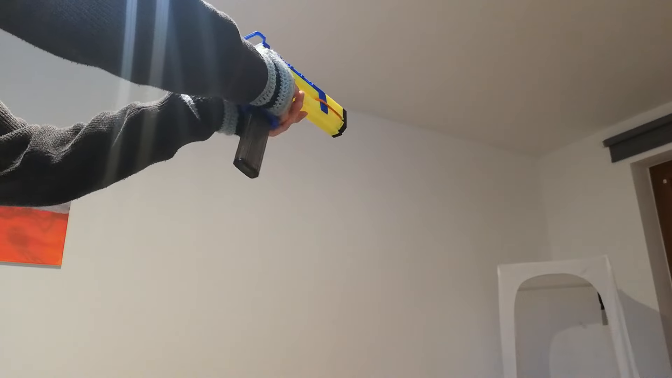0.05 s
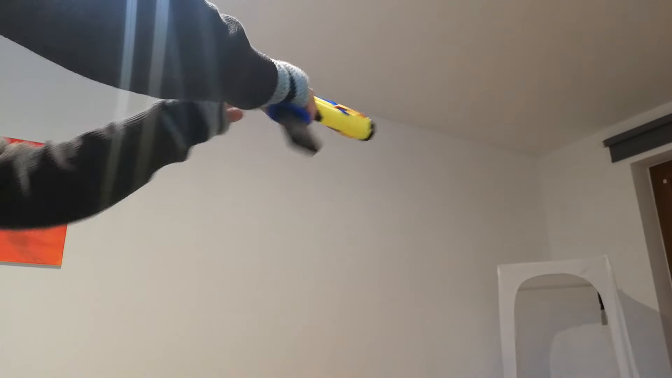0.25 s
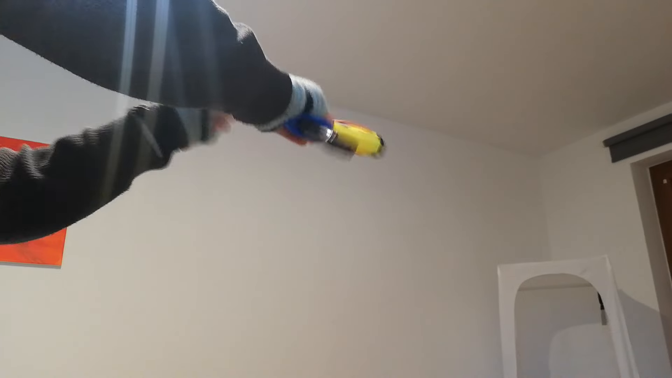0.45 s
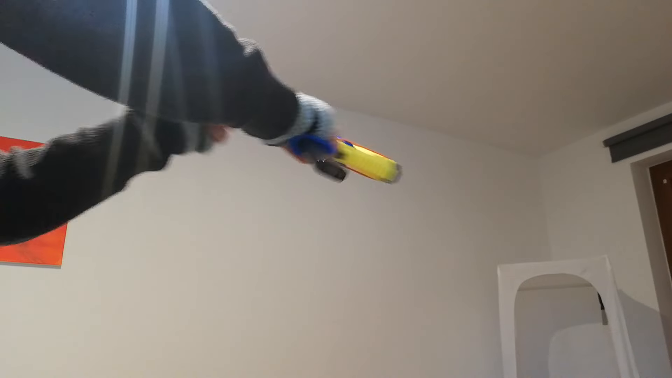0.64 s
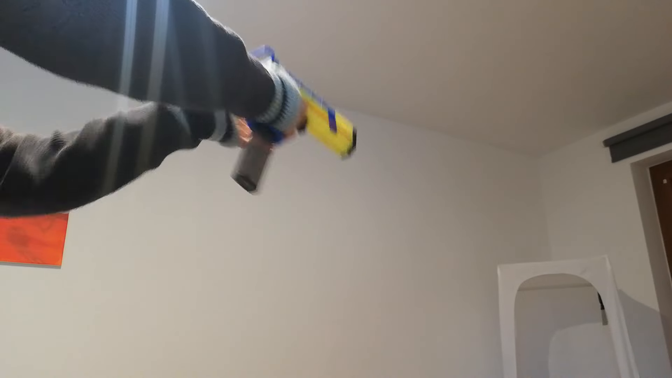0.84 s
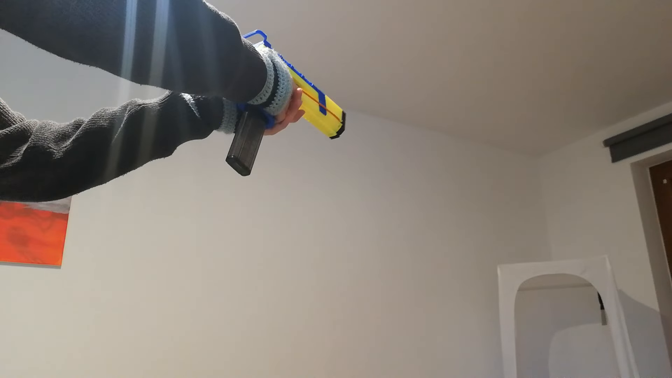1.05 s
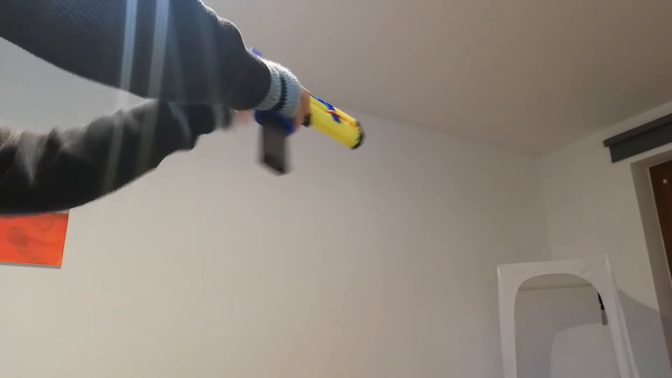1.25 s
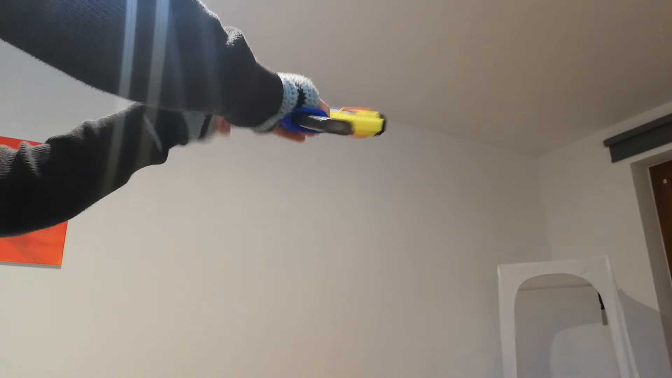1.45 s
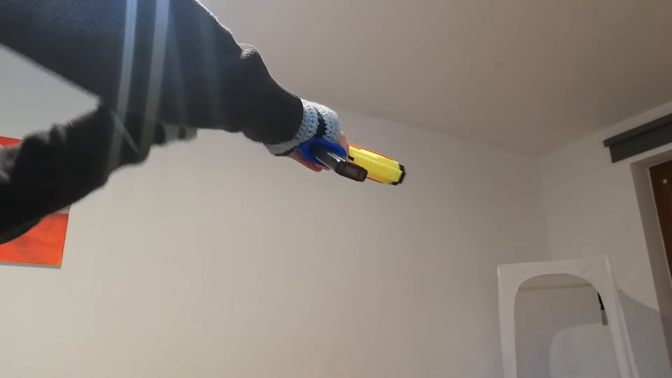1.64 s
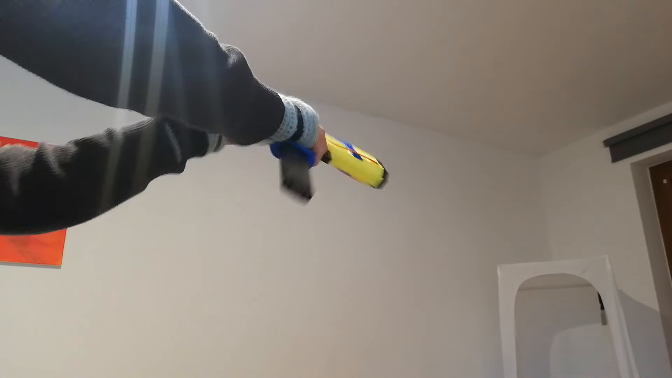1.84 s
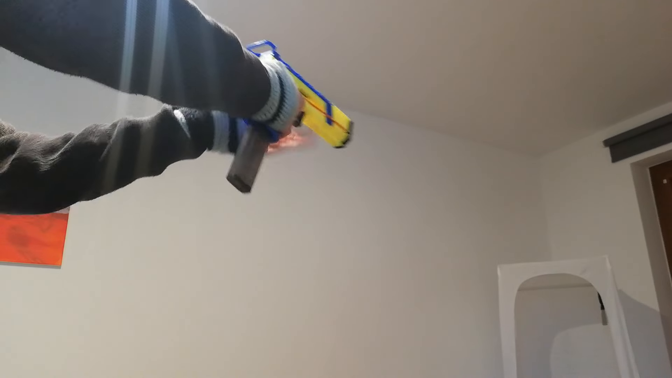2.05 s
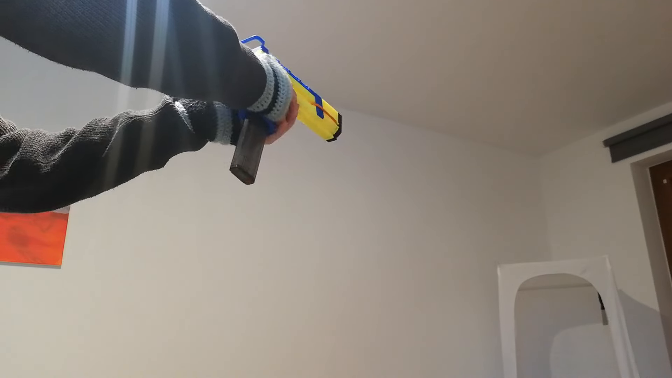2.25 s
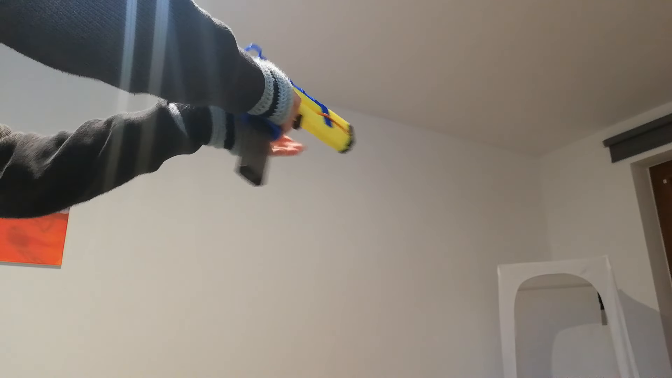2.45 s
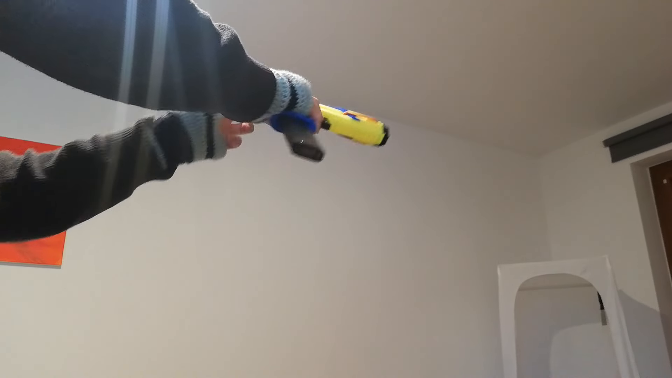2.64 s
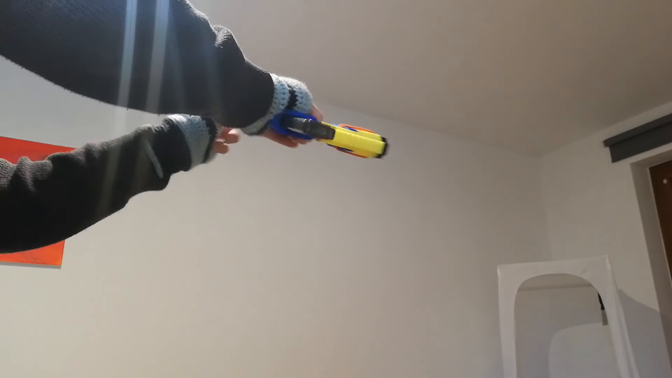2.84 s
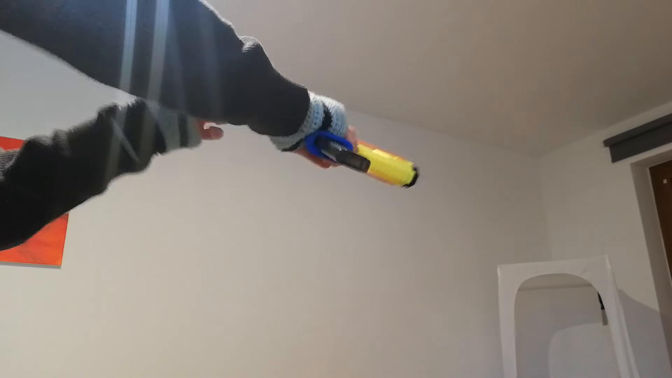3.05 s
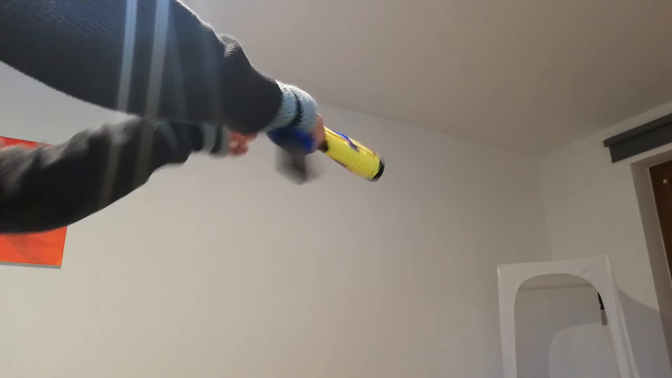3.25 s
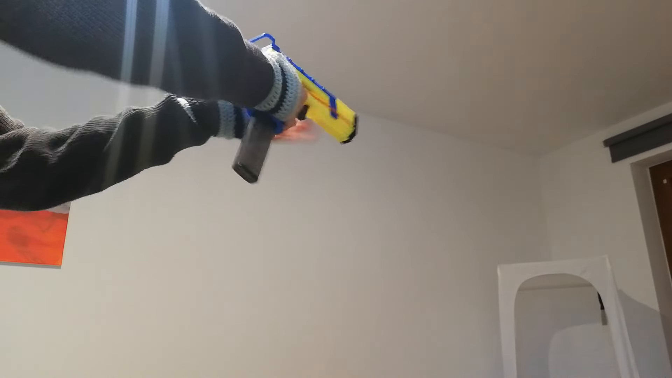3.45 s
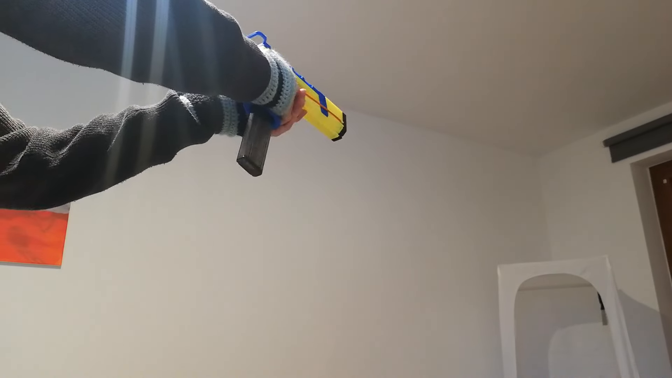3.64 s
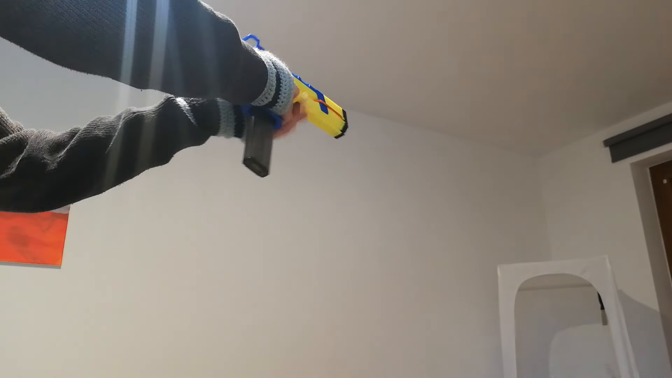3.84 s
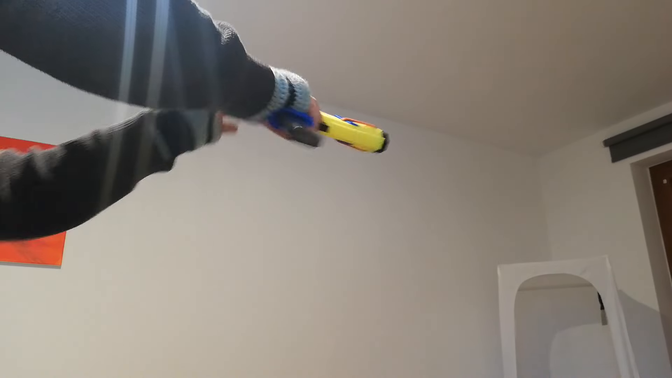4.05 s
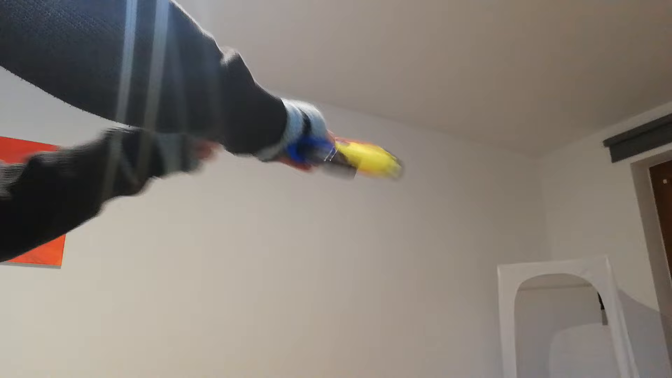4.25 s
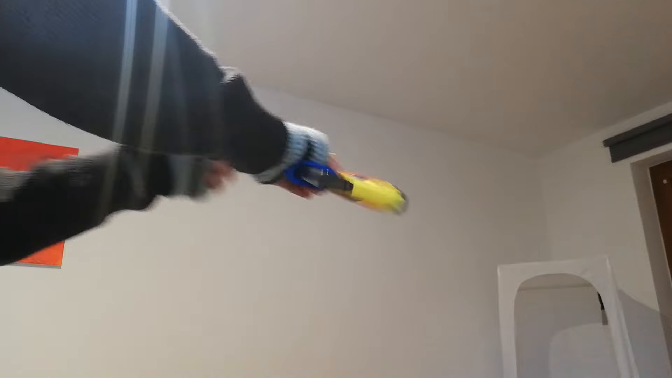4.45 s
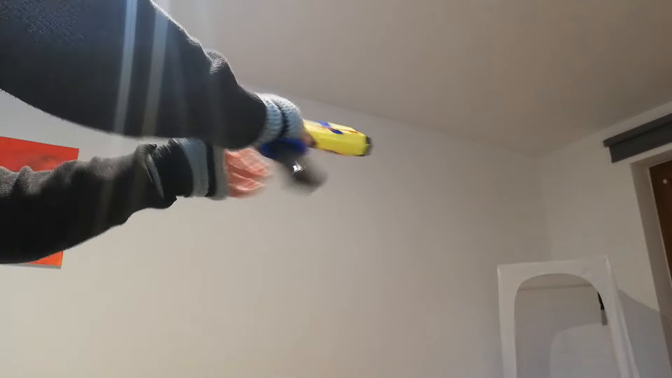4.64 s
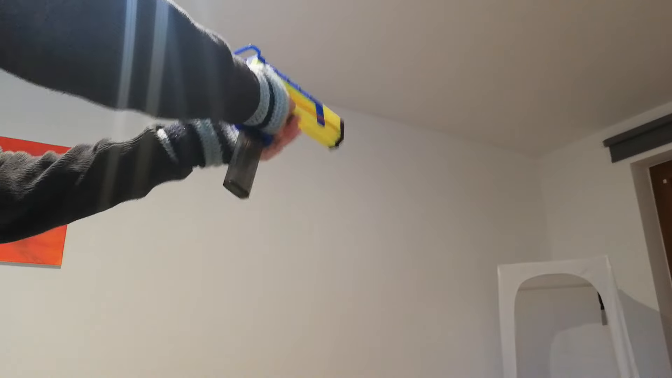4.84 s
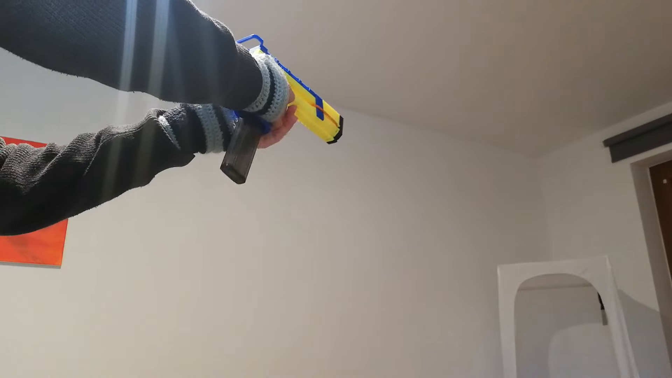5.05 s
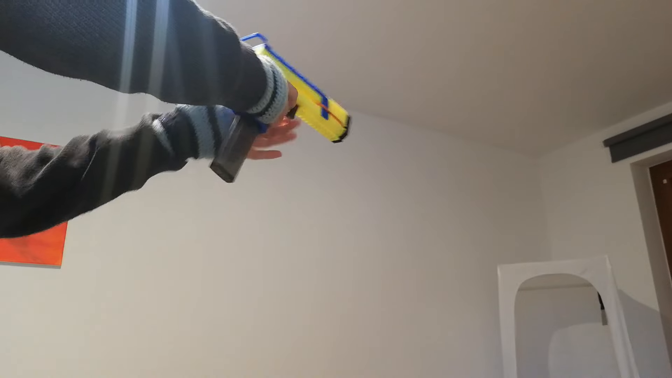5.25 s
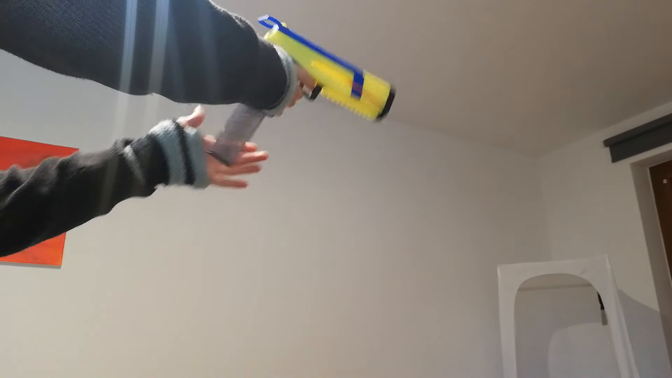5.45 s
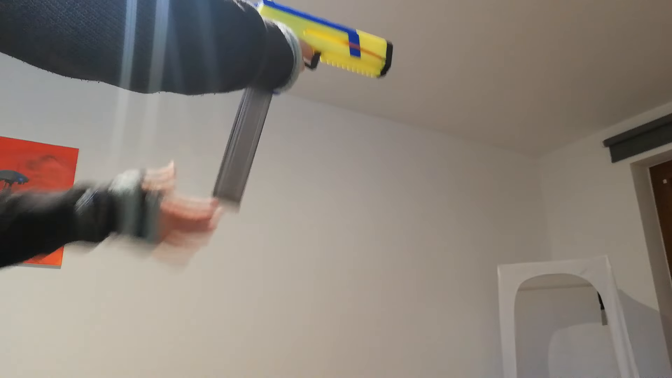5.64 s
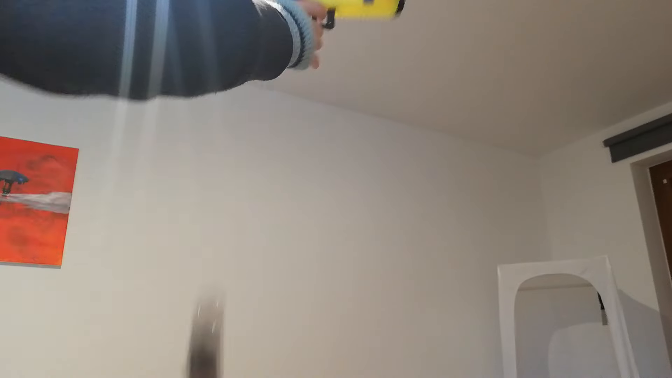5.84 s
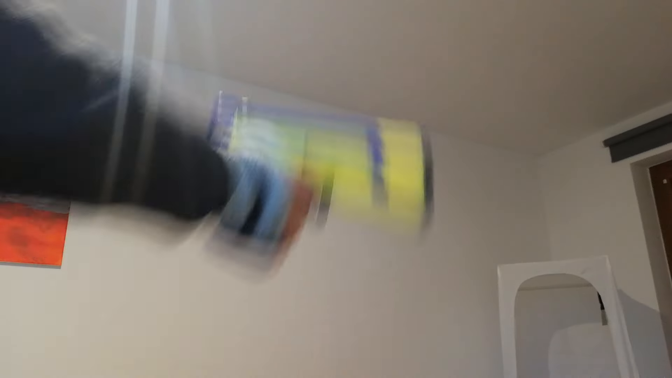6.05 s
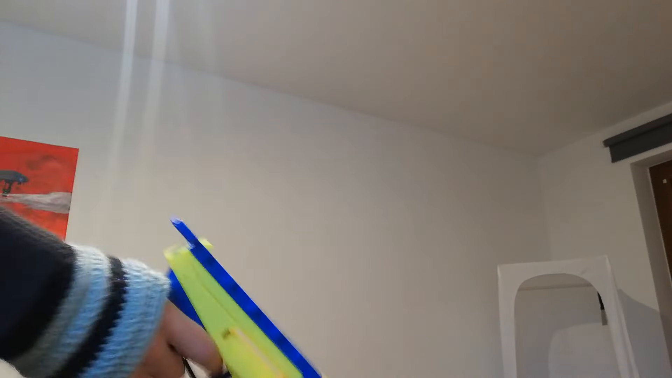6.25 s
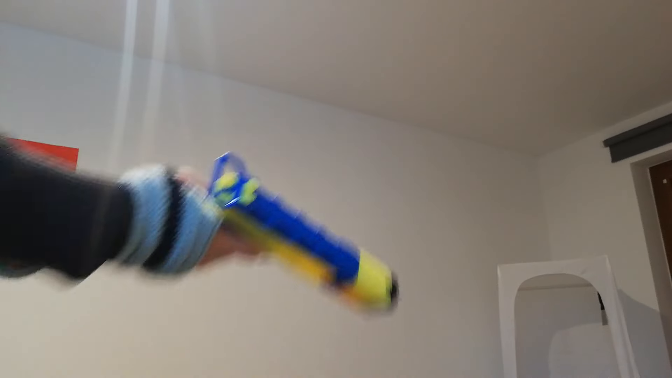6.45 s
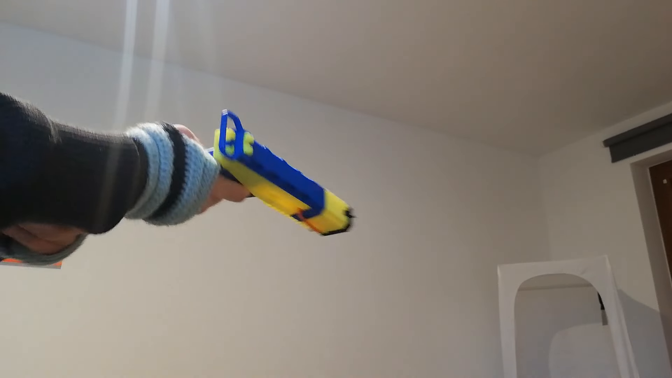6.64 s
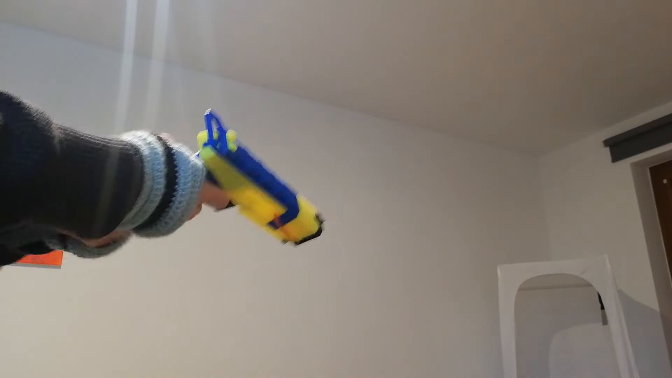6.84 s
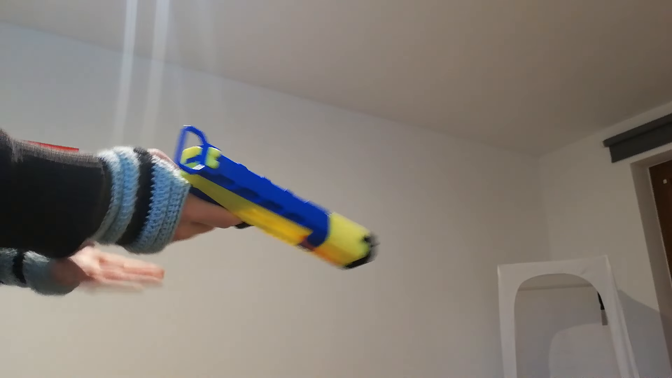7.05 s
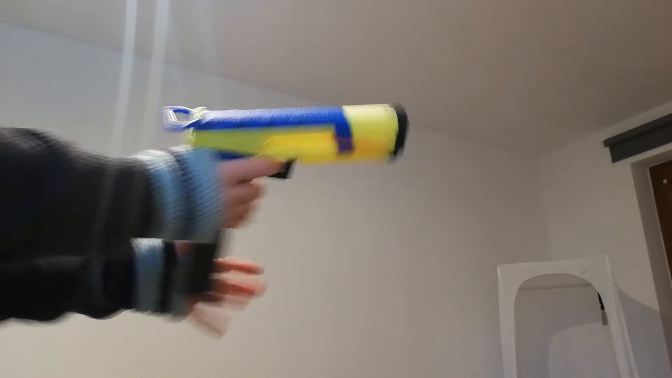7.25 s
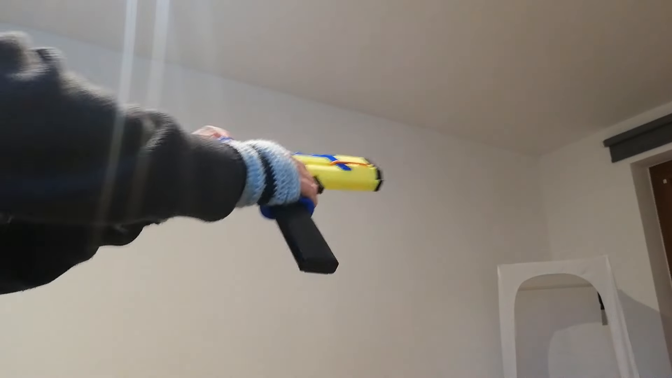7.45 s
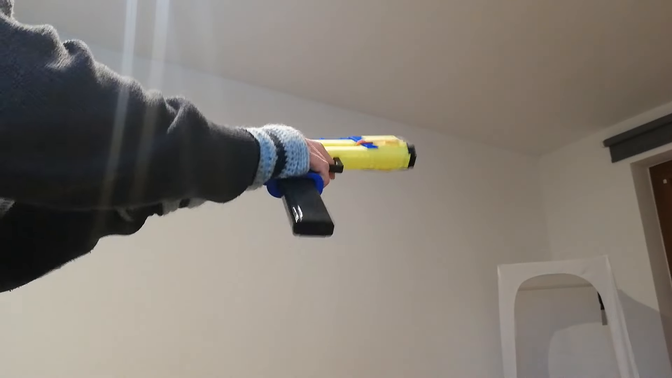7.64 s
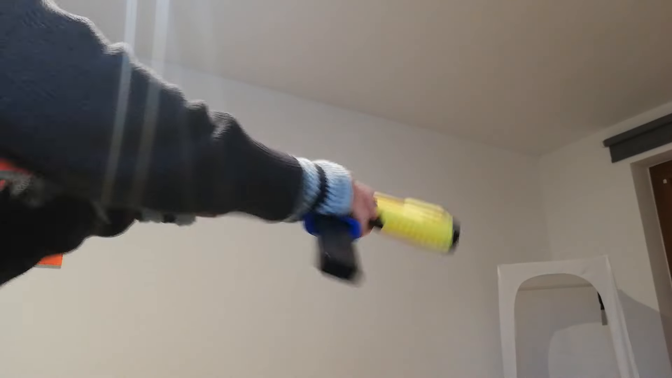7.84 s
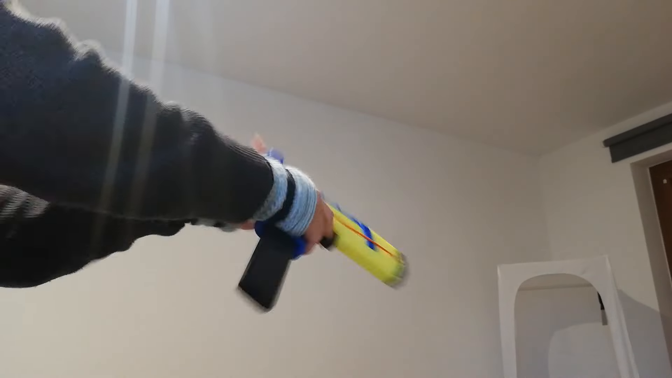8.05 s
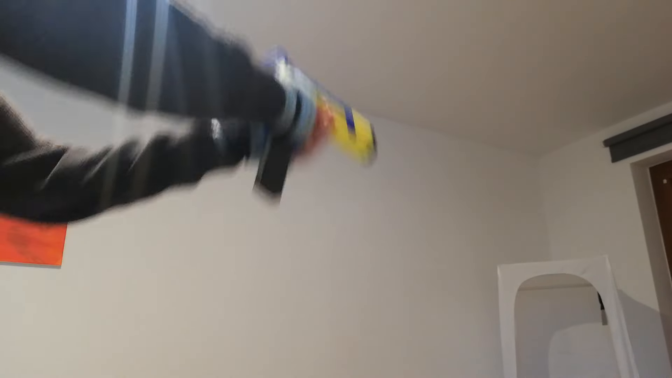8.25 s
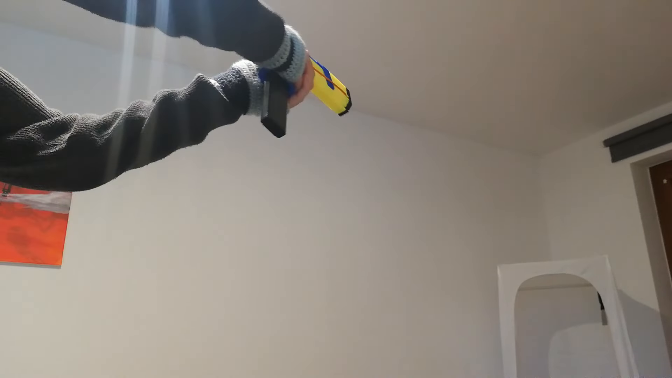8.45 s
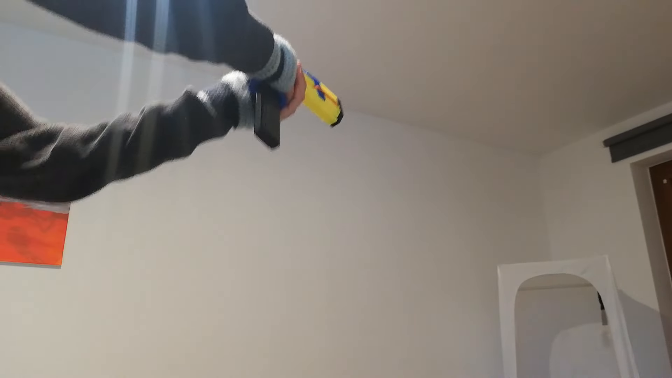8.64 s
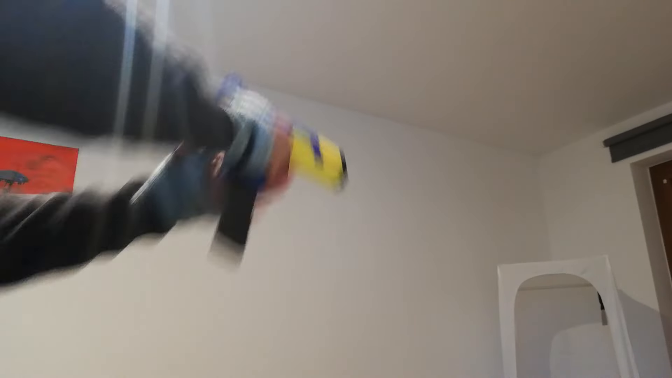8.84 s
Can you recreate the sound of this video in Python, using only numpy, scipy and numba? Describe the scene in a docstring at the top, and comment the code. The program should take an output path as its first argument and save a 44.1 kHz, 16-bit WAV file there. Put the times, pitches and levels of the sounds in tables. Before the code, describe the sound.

Indoors, sharp plastic snaps with close dart thuds alternate with quick slide-racking clacks, then a magazine clatters down, is knocked home, and one more shot follows.

```python
"""Toy blaster in a bare room

A spring-powered plastic blaster: the plunger cracks, the foam dart thuds on the wall, the slide scrapes
back and forward to its stops; the magazine drops, bounces and is pushed in again.
Hits are short rattles ringing a body, scrapes are grainy noise, and each source has a room tail.
A gain control squeezes every loud moment, so the room seems to ring long and then falls away."""
import sys
import numpy as np
from scipy import signal
from scipy.fft import rfft, irfft, next_fast_len
from scipy.io import wavfile
from scipy.ndimage import uniform_filter1d, minimum_filter1d
from numba import njit

SR = 44100
rng = np.random.default_rng(int(sys.argv[2]) if len(sys.argv) > 2 else 0)


def int16_out(signal):
    """Quantize to a 16-bit WAV file."""
    q = np.round(np.clip(np.atleast_2d(signal).T, -1, 1) * 32767)
    wavfile.write(sys.argv[1], SR, q.astype(np.int16))


N = 392931  # length in samples


def amp(db):
    """Turn decibels into a plain multiplier."""
    return 10 ** (np.asarray(db) / 20)


def unit(x):
    """Scale a sound to an average (RMS) level of 1."""
    return x / np.sqrt(np.mean(x ** 2) + 1e-20)


def along(points, hz):
    """Read a curve of (Hz, value) points on a logarithmic frequency axis."""
    f, v = np.transpose(points)
    return np.interp(np.log(hz + 1), np.log(f + 1), v)


def filtered(x, response):
    """Multiply the spectrum of x by a response that depends on frequency."""
    size = next_fast_len(x.shape[-1] + 8192)
    spectrum = rfft(x, size) * response(np.fft.rfftfreq(size, 1 / SR))
    return irfft(spectrum, size)[..., :x.shape[-1]]


# How alike left and right are in the room.
# Each row: frequency in Hz, likeness (1 is the same, 0 unrelated, below 0 opposed).
ALIKE = [(60, 1), (150, 0.94), (300, 0.97), (550, -0.61), (1200, -0.085), (5000, 0.062), (12000, 0.073)]


def paired(two):
    """Mix two unrelated sounds into a left-right pair that is as alike as the room makes it."""
    def mid_and_side(hz):
        turn = np.arccos(np.clip(along(ALIKE, hz), -1, 1)) / 2
        return np.array([np.cos(turn), np.sin(turn)])
    mid, side = filtered(two, mid_and_side)
    return np.array([mid + side, mid - side])


# How long the room rings.
# Each row: frequency in Hz, time to die away by 60 dB in seconds.
ROOM = [(55, 0.63), (130, 0.4), (350, 0.48), (900, 0.48), (2500, 0.42), (6000, 0.35), (12000, 0.29),
        (16000, 0.29)]


def room(x, wet_db, near_treble_db=0):
    """Add a noise tail, new at each call: every frequency dies at its own speed.

    Treble aimed away from the listener arrives weaker in the direct sound."""
    hz, t, z = signal.stft(rng.standard_normal((2, SR)), SR, nperseg=256)
    dying = amp(-60 * t / along(ROOM, hz)[:, None])
    tail = signal.istft(z * dying, SR, nperseg=256)[1]
    build_up = 1 - np.exp(-np.arange(tail.shape[1]) / SR / 0.00053)  # seconds
    tail = paired(tail * build_up)
    tail = tail / np.linalg.norm(tail[0])
    near = filtered(x, lambda f: amp(near_treble_db / (1 + (5000 / (f + 1)) ** 4)))
    return near + amp(wet_db) * signal.fftconvolve(x.mean(0)[None], tail, axes=1)[:, :N]


def body(colour, modes, treble_db, size=4096):
    """Ring of a struck object: resonances stand on a tone colour, starting at once, with energy 1."""
    hz = np.fft.rfftfreq(size, 1 / SR)
    db = along(colour, hz) + treble_db / (1 + (5200 / (hz + 1)) ** 6)
    for centre, width, gain in modes:
        db = db + gain / (1 + ((hz - centre) / (width / 2)) ** 2)
    # folding the cepstrum forward gathers the energy at the start of the ring
    cepstrum = irfft(np.log(amp(db) + 1e-6))
    cepstrum[1:size // 2] *= 2
    cepstrum[size // 2 + 1:] = 0
    ring = irfft(np.exp(rfft(cepstrum)))
    return ring / np.linalg.norm(ring)


def blows(rows, colour, modes, rise, t60, focus_db):
    """Ring a body with one short rattle of contacts per row: seconds, dB, treble dB, band Hz, pan dB."""
    out, t = np.zeros((2, N + SR)), np.arange(2048) / SR
    for s, db, treble_db, band_hz, pan_db in rows:
        rattle = rng.standard_normal((2, len(t))) * amp(2.2 * rng.standard_normal(len(t)))
        # rise and t60 (seconds) set the timing of the contacts; the spectrum is levelled below
        rattle *= amp(-60 * t / t60) * (1 - np.exp(-(t + 1 / SR) / rise))
        rattle[1] = 1.49 * rattle[0] + 0.93 * rattle[1]  # left and right get partly different paths
        spectrum = rfft(rattle)
        rattle = irfft(spectrum / np.abs(spectrum))  # hard contacts excite every frequency alike
        rattle *= amp(-60 * t / 0.19)
        rattle /= np.linalg.norm(rattle[0])
        focus = (band_hz, 0.9 * band_hz, focus_db)  # the spot that is hit favours its own band
        struck = body(colour, [*modes, focus], treble_db)
        sound = signal.fftconvolve(rattle, struck[None], axes=1)
        sides_db = db + np.array([[0.5], [-0.5]]) * pan_db
        out[:, round(s * SR):][:, :sound.shape[1]] += amp(sides_db) * sound
    return out[:, :N]


# Tone colour of the quiet air. Each row: frequency in Hz, relative level in dB.
AIR = [(15, -30), (25, 23), (103, -20), (172, -17), (538, -27), (1360, -17), (2750, -27), (4600, -20),
       (5570, -30), (6550, -23.5), (10700, -26), (14800, -37), (16500, -64.5)]
# A low hum that wavers. Each row: time in seconds, level in dB before the gain control.
HUM = [(0.0, -67.5), (0.4, -51), (1.1, -65.5), (1.6, -55), (2.9, -74), (4.1, -55.5), (4.9, -69.5),
       (5.6, -59), (6.0, -67.5), (6.4, -47), (7.0, -63.5), (7.7, -51.5), (8.6, -63), (8.9, -41)]


def background():
    """Quiet air of the house as coloured noise, and a wavering hum as narrow noise around 52 Hz."""
    air = filtered(rng.standard_normal((2, N)), lambda hz: amp(along(AIR, hz)) * (hz > 75))
    air = unit(paired(air))
    hum = unit(filtered(rng.standard_normal(N), lambda hz: 1 / (1 + ((hz - 52) / 5.5) ** 4)))
    hum_db = np.interp(np.arange(N) / SR, *np.transpose(HUM))
    return amp(-62.5) * air + amp(hum_db) * hum


# Plunger cracks. Each row: start in seconds, strength in dB, treble in dB, left minus right in dB.
SHOTS = [(0.049, 27.5, -11, 4.5), (1.152, 27.5, -13.5, -1.5), (2.313, 31.5, -13, 3.5), (3.752, 31, -14, 1),
         (5.104, 34.5, -5, -2.5), (8.549, 29, -11.5, 2.5)]
# Tone colour of a crack. Each row: frequency in Hz, relative level in dB.
SHOT_COLOUR = [(59, -55), (100, -30.5), (602, -22), (1380, -6.5), (1990, -12), (2260, -12), (4580, -7.5),
               (5790, -5), (9880, -4.5), (15100, -13.5), (16500, -29)]
# Resonances of the plastic shell. Each row: frequency in Hz, width in Hz, lift in dB.
SHELL = [(470, 94, 5.5), (877, 130, 10), (1446, 50, 4), (1790, 99, 4), (2264, 190, 4.5), (3680, 63, 1),
         (4500, 550, 4.5), (6850, 300, 1.5), (9670, 3100, 8)]


def plunger_cracks():
    """The plunger slams and rings the plastic shell, favouring a band around 9200 Hz."""
    rows = [(s, db, treble_db, 9200, pan_db) for s, db, treble_db, pan_db in SHOTS]
    cracks = blows(rows, SHOT_COLOUR, SHELL, rise=0.0069, t60=0.049, focus_db=9.0)
    return room(cracks, wet_db=3.0)


# Foam darts on the wall. Each row: start in seconds, strength in dB, treble in dB.
DARTS = [(0.139, 32, -12), (1.242, 35, -12), (2.399, 34.5, -19.5), (3.845, 35, -12), (8.643, 34, -12.5)]
# Tone colour of a thud. Each row: frequency in Hz, relative level in dB.
DART_COLOUR = [(29, -48), (50, -26), (273, -8), (721, 0), (795, 1.5), (1200, -4), (1390, -6.5),
               (3850, -12.5), (9220, 0), (15000, -22.5), (16500, -79)]
# Resonances of the wall. Each row: frequency in Hz, width in Hz, lift in dB.
WALL = [(56.6, 56, 12), (134, 18, 2.9), (163, 78, 8.1), (271, 17, 7.7), (498, 220, 10.4), (850, 76, 5.2),
        (1390, 110, 7.1), (2010, 220, 1)]


def dart_thuds():
    """Each foam dart rings the wall and gets a room tail of its own."""
    thuds = 0
    for row in DARTS:
        hit = (*row, 463, 4.1)  # favoured band in Hz, left minus right in dB
        thud = blows([hit], DART_COLOUR, WALL, rise=0.0017, t60=0.016, focus_db=-1.5)
        thuds = thuds + room(thud, wet_db=5.5)
    return thuds


# Small clicks of catches and handling. Each row: start in seconds, strength in dB, treble in dB,
# favoured band in Hz, left minus right in dB.
CLICKS = [(0.3175, 3.5, -8.5, 1140, -2), (0.4991, 2, -16, 7900, 0), (1.5938, -7, -5, 2050, 6),
          (2.28, -30.5, 7, 6320, 4.5), (2.773, -31, 1, 1040, -1), (2.8671, -12.5, -8, 1720, 8),
          (3.0199, -2.5, -24, 4560, 3), (3.6935, -37, -23, 4600, -1.5), (4.0555, 2, -16, 1154, -9),
          (4.1947, -16.5, -6.5, 1180, 0), (4.2662, -26, -8, 2140, 8), (4.2858, -9.5, -5, 2250, 0.5),
          (4.2909, 2.5, -6, 4470, 11), (4.9776, -36, -11, 1410, -6), (5.3012, -8, -6, 7030, -5),
          (5.5013, -13.5, -8.5, 2960, -12), (5.6141, -16, -18, 1760, 3), (5.698, -21.5, -18, 4460, 1),
          (5.765, -77, -26.5, 4380, -2), (5.899, -38, -15, 2690, -3), (5.945, -29, -30, 1400, 3.5),
          (5.9639, -35, -27, 1410, 3), (7.5, -15, -2, 1390, -2), (7.5175, -6, 3, 1400, 6),
          (7.6493, -21.5, -12, 9600, -6), (7.7793, 4, -1, 3270, -2)]
# Tone colour of a click, also used for seating the magazine. Each row: frequency in Hz, relative level in dB.
CLICK_COLOUR = [(120, -19.5), (200, -18.5), (676, -21.5), (1360, -8), (1730, -15.5), (2090, -8.5),
                (6430, -6.5), (10000, -6.5), (15300, -32), (16500, -20)]


def small_clicks():
    """Catches and fingers tap the shell, each tap favouring the band of its own spot."""
    clicks = blows(CLICKS, CLICK_COLOUR, SHELL, rise=0.0002, t60=0.023, focus_db=12)
    return room(clicks, wet_db=7.5)


# Slide strokes, back then forward, each ending at its stop. Each row: start in seconds, end in seconds,
# mid-stroke scrape level in dB, top frequency of the tube resonance in Hz, its starting lift in dB.
STROKES = [(0.51, 0.559, -7.5, 8300, 6), (0.678, 0.736, -18.5, 5400, 1), (1.615, 1.681, -12.5, 6500, 8.5),
           (1.789, 1.855, -21, 5800, 4.5), (3.025, 3.086, -11, 8220, 12.5),
           (3.234, 3.303, -11.5, 6730, 9.5), (4.296, 4.355, -9.5, 7620, 13),
           (4.474, 4.539, -14, 5930, -0.5), (7.785, 7.849, -6.5, 10250, 16.5),
           (7.956, 8.01, -12, 5800, 4.5)]
# Slower rubbing of the magazine in hand and on the floor. Each row: start in seconds,
# loudest moment in seconds (it may lie before the start), end in seconds, loudest level in dB,
# favoured band in Hz, lift of that band in dB.
RUBS = [(5.632, 5.691, 5.74, -46.5, 4350, 11), (6.792, 6.765, 6.903, -29.5, 1400, 18),
        (7.185, 7.194, 7.219, -39.5, 6000, 7)]
ATTACK_S, FROM_DB, PUSH_DB_PER_S = 0.021, -13.5, 68.5  # the slide gets going, then presses ever harder
TUBE_REST_HZ, TUBE_RISE_S = 3930, 0.023  # the resonance climbs from rest towards its top
TUBE_FADE_S = 0.061  # the resonance dies away once the slide is at speed
RUB_FADE_DB = 10.5  # a rub is this much weaker away from its loudest moment


def motion(t):
    """Give the scrape level in dB, resonance in Hz and its lift in dB of whatever rubs at times t."""
    level_db = np.full(len(t), -200.)
    centre_hz = np.full(len(t), float(TUBE_REST_HZ))
    lift_db = np.zeros(len(t))
    for start, end, db, top_hz, lift in STROKES:
        on = (t >= start) & (t < end)
        u = t[on] - start
        getting_going_db = FROM_DB * np.clip(1 - u / ATTACK_S, 0, 1)
        pressing_db = PUSH_DB_PER_S * (u - (end - start) / 2)
        level_db[on] = db + getting_going_db + pressing_db
        centre_hz[on] = top_hz + (TUBE_REST_HZ - top_hz) * np.exp(-(u / TUBE_RISE_S) ** 2)
        lift_db[on] = lift * np.exp(-(u / TUBE_FADE_S) ** 4)
    for start, loudest, end, db, hz, lift in RUBS:
        on = (t >= start) & (t < end)
        level_db[on] = db - RUB_FADE_DB * np.interp(t[on], [start, loudest, end], [1, 0, 1])
        centre_hz[on], lift_db[on] = hz, lift
    return level_db, centre_hz, lift_db


# Tone colour of the scrape. Each row: frequency in Hz, relative level in dB.
SCRAPE_COLOUR = [(180, -82), (300, -34), (1000, -19.5), (1230, -5.5), (1480, -10), (2170, -6), (2520, -8),
                 (7630, 0), (15700, -19.5), (16500, -69.5)]


def scrapes(width, grain_db, grit_db):
    """Plastic rubs on plastic: clumped grains through the shell and a resonance that moves with the stroke."""
    fine = uniform_filter1d(rng.standard_normal(N), size=90)
    coarse = uniform_filter1d(rng.standard_normal(N), size=350)
    clumps = unit(fine + 3 * coarse)
    grains = rng.standard_normal((2, N)) * amp(grain_db * rng.standard_normal(N) + grit_db * clumps)
    hz, t, z = signal.stft(grains, SR, nperseg=256)
    _, centre_hz, lift_db = motion(t)
    # width is in natural-log units of frequency
    tube_db = lift_db * np.exp(-(np.log((hz[:, None] + 1) / centre_hz) / width) ** 2)
    rub = signal.istft(z * amp(tube_db), SR, nperseg=256)[1][:, :N]
    shell = body(SCRAPE_COLOUR, SHELL, 0)
    rub = unit(signal.fftconvolve(rub, shell[None], axes=1)[:, :N])
    level_db = motion(np.arange(N) / SR)[0]
    loudness = uniform_filter1d(amp(level_db), size=128)
    return room(loudness * rub, wet_db=7.0)


# Slide against its rear stop. Each row: start in seconds, strength in dB, treble in dB.
BACK_STOPS = [(0.5601, 15.5, -10), (1.6739, 21, -1.5), (3.092, 12, -22.5), (4.354, 14, -29),
              (7.84, 18.5, -6)]
# Tone colour of the rear stop. Each row: frequency in Hz, relative level in dB.
BACK_COLOUR = [(180, -36.5), (300, -19), (1090, -45.5), (2980, -5), (3530, -17.5), (4540, 5.5), (5640, -19),
               (10300, -4), (14700, -39.5), (16500, -54.5)]


def rear_stops():
    """The slide hits its rear stop and rings the shell."""
    rows = [(*row, 4500, 0.5) for row in BACK_STOPS]  # favoured band in Hz, left minus right in dB
    hits = blows(rows, BACK_COLOUR, SHELL, rise=0.0003, t60=0.0091, focus_db=8)
    return room(hits, wet_db=3.5)


# Slide against its front stop. Each row: start in seconds, strength in dB, treble in dB, favoured band in Hz.
FRONT_STOPS = [(0.7455, 28.5, 6, 1450), (1.8646, 27, 8, 2020), (3.2957, 24, -2, 2202),
               (4.5338, 32.5, 5.5, 2370), (8.0249, 26, 4.5, 1565)]
# Tone colour of the front stop. Each row: frequency in Hz, relative level in dB.
FRONT_COLOUR = [(88, -43.5), (150, -21), (571, -22.5), (881, -12.5), (1690, 3), (1970, -4), (3930, 1.5),
                (9510, -5.5), (15300, -30.5), (16500, -71.5)]


def front_stops():
    """The slide hits its front stop and rings the shell, its direct treble weakened."""
    rows = [(*row, 0) for row in FRONT_STOPS]  # left and right equally strong
    hits = blows(rows, FRONT_COLOUR, SHELL, rise=0.0014, t60=0.047, focus_db=5)
    return room(hits, wet_db=0, near_treble_db=-11)


# Magazine bouncing on the floor. Each row: start in seconds, strength in dB, treble in dB,
# favoured band in Hz, left minus right in dB.
MAGAZINE = [(6.1465, 29.5, -10, 1230, 4.5), (6.1545, 19, -3, 1150, 7), (6.183, 18.5, -1.5, 3330, 10),
            (6.199, 21, -3.5, 1148, 3), (6.477, 20.5, -2, 1330, -1), (6.482, 14, -5, 1387, 8),
            (6.488, 24.5, -6, 1544, 1), (6.645, 7.5, -5.5, 1410, -3), (6.743, -8, -6, 1280, -18),
            (6.783, 8, -9, 1580, 3), (6.928, -12, -3, 1480, 0), (6.991, -33.5, -32, 1110, 40)]
# Tone colour of a bounce. Each row: frequency in Hz, relative level in dB.
MAGAZINE_COLOUR = [(24, -82), (40, -40), (148, 5), (608, -8.5), (1400, -7.5), (1620, -6.5), (3370, -3),
                   (4920, -3), (9970, 8), (15300, -11), (16500, -73)]
# Resonances of the magazine's case. Each row: frequency in Hz, width in Hz, lift in dB.
CASE = [(173.5, 63, 2.1), (370, 25, 4.2), (1050, 79, 3.6), (1355, 280, 7.7), (1940, 150, 3.5),
        (3350, 57, 9.2)]


def magazine_bounces():
    """The dropped magazine hits the floor again and again and rings its case, direct treble weakened."""
    bounces = blows(MAGAZINE, MAGAZINE_COLOUR, CASE, rise=0.00025, t60=0.014, focus_db=12.5)
    return room(bounces, wet_db=5, near_treble_db=-15)


# Magazine pushed home, its lip touching first. Each row: start in seconds, strength in dB, treble in dB,
# favoured band in Hz, left minus right in dB.
SEATING = [(7.1862, -11.5, -16, 1780, 3.5), (7.2215, 30.5, 8.5, 1880, 8.5)]


def magazine_seating():
    """The magazine's lip touches, then the magazine knocks home and rings its case."""
    knocks = blows(SEATING, CLICK_COLOUR, CASE, rise=0.00089, t60=0.021, focus_db=9)
    return room(knocks, wet_db=0)


def scene():
    """Add up all sources, each answered by its own part of the room."""
    blaster = plunger_cracks() + small_clicks() + rear_stops() + front_stops()
    blaster += scrapes(width=0.04, grain_db=4.5, grit_db=4.0)
    magazine = magazine_bounces() + magazine_seating()
    return background() + blaster + dart_thuds() + magazine


@njit
def follow(power, attack, release):
    """Follow a changing value, with one step share for rising and another for falling."""
    out, level = np.empty_like(power), 0.
    for i in range(len(power)):
        level += (attack if power[i] > level else release) * (power[i] - level)
        out[i] = level
    return out


def gain_control(x, knee_db, squeeze, hush_db, attack, release):
    """Above the knee, drop the gain by a share of the excess; below it, turn faint sound further down."""
    power = uniform_filter1d((x ** 2).mean(0), size=32)
    power = follow(power, 1 / (1 + attack * SR), 1 / (1 + release * SR))  # times in seconds
    over_db = 10 * np.log10(np.abs(power) + 1e-12) - knee_db
    squeeze_db = -squeeze * np.maximum(over_db, 0)
    faint_db = np.clip(over_db, -hush_db, 0)
    return x * amp(squeeze_db + faint_db)


def limiter(x, top_db, size, hold):
    """Duck the gain just before a peak would pass the top, then let it recover gradually."""
    needed = np.minimum(amp(top_db) / (np.abs(x).max(0) + 1e-9), 1)
    recovering = 1 - follow(1 - needed, 0.99, 1 / (1 + hold * SR))  # hold in seconds
    ducked = minimum_filter1d(np.minimum(needed, recovering), size=size)  # size in samples
    return x * uniform_filter1d(ducked, size=size)


def record(dry):
    """Apply gain control, a limiter, soft clipping at full scale, then a steep cut above 16300 Hz."""
    x = gain_control(dry, knee_db=-38, squeeze=0.39, hush_db=0.5, attack=0.0027, release=0.027)
    x = limiter(x, top_db=-0.7, size=400, hold=0.03)
    x = x / (1 + np.abs(x) ** 6) ** (1 / 6)
    return filtered(x, lambda hz: 1 / (1 + (hz / 16300) ** 120))


dry = scene()
out = record(dry)
int16_out(out)
```